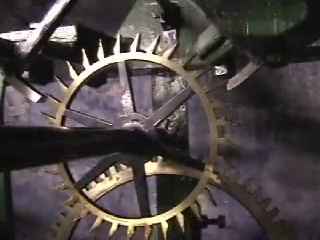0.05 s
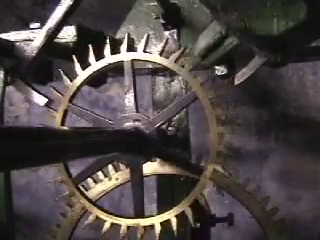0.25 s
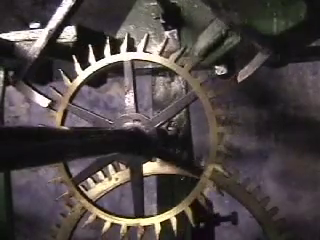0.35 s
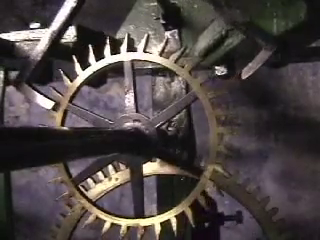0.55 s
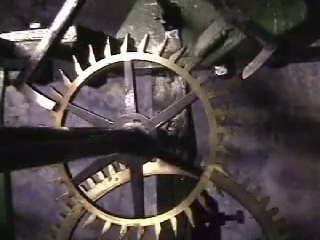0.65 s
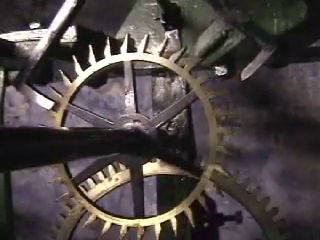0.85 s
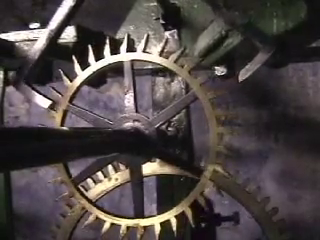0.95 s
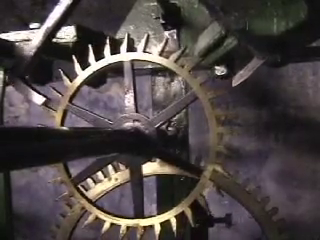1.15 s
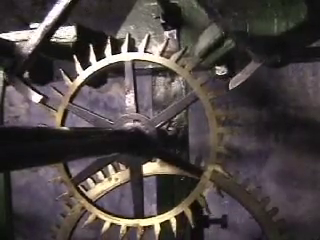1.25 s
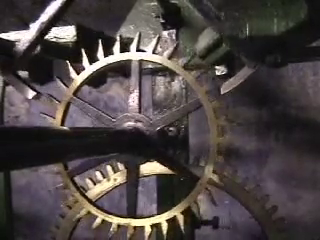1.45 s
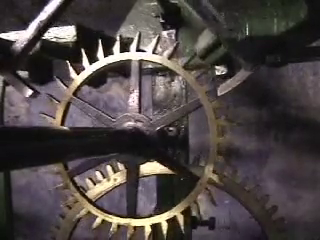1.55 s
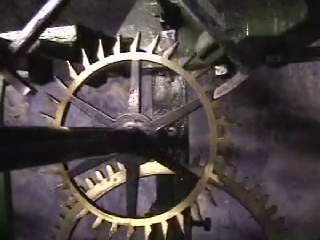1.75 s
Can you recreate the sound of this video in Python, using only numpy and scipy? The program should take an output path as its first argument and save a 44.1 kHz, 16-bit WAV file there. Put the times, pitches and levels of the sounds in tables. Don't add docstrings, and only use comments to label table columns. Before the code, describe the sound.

A big clock escapement ticks twice, very close: first a bright, rattling metal clack with quick rebounds, then over a second later one hard, duller clunk; short stony room echo, low hum, faint camera whine and hiss.

```python
import sys
import numpy as np
from scipy import signal
from scipy.fft import rfft, irfft
from scipy.io import wavfile
from scipy.ndimage import uniform_filter1d

SR = 44100
rng = np.random.default_rng(int(sys.argv[2]) if len(sys.argv) > 2 else 0)


def voltage_ratio(decibels):
    exponent = np.asarray(decibels, float) / 20
    return 10 ** exponent


def generate_wav(signal):
    frames = np.transpose(np.atleast_2d(signal))
    scaled = np.clip(frames, -1, 1) * 32767
    pcm = np.round(scaled).astype(np.int16)
    wavfile.write(sys.argv[1], SR, pcm)


N = 79380

# start in seconds, level in dB, brightest Hz,
# sharpness of that colour from 0 to 1.
ENTRY_CONTACTS = [
    (.2420, -18.5, 8900, 0),
    (.2460, -24, 4630, 0.4),
    (.2510, -23, 5240, .3),
    (.2770, -26, 4500, 0.33),
    (0.2844, -26.5, 3000, 0.24),
    (0.2573, -26.5, 4000, 0.6),
    (0.2724, -22.5, 1500, .6),
    (.3130, -38.5, 1200, 0.3),
]
EXIT_CONTACTS = [
    (1.4267, -30.5, 9000, 0.7),
    (1.4304, -14, 3020, 0.1),
    (1.4400, -53, 1824, 0.9),
]
# frequency in Hz, rise in seconds.
FRAME_RISE = [(60, 0.053), (150, 0.04), (700, 0.00057), (3000, 0.00088), (15000, 0.00022)]
# frequency in Hz, level in dB.
PORT_DB = [(5900, -1.6), (6600, -10), (7300, -10), (8200, -1), (10000, -4.5), (11000, -12), (15000, -17.5)]


def read(points, hz):
    f, value = np.transpose(points)
    return np.interp(np.log(hz + 1), np.log(f + 1), value)


def evened(x):
    return x / np.sqrt(np.mean(x ** 2) + 1e-20)


def slow(rate_hz, count):
    knots = rng.standard_normal((count, 200))
    place = np.arange(N) * rate_hz / SR
    return np.array([np.interp(place, np.arange(200), k) for k in knots])


def drone():
    # time in seconds, pitch in Hz, level in dB.
    course = [(0, 50.9, -56.5), (.22, 49.84, -50.5), (.28, 50.8, -54), (.46, 52.1, -44), (.7, 52.03, -47),
              (1.402, 54.14, -51), (1.8, 56, -58)]
    waver_db, side_db = -0.5, -8
    s, hz, db = np.transpose(course)
    t = np.arange(N) / SR
    level = voltage_ratio(np.interp(t, s, db) + waver_db * slow(10.2, count=1)[0])
    turns = np.cumsum(np.interp(t, s, hz)) / SR
    note = np.sqrt(2) * level * np.sin(2 * np.pi * turns)
    return note + voltage_ratio(side_db) * note * np.array([[1], [-1]])


def camera():
    # order, level in dB.
    orders = [(1, -3), (2, -10), (3, -12), (4, 0), (5, -14), (6, -14), (7, -15), (8, -11), (9, -12),
              (10, -22), (11, -10), (12, -3), (13, -21), (14, -23), (15, -16), (16, -13), (17, -16),
              (18, -17), (19, -17), (20, -8), (21, -17), (22, -17), (23, -14), (24, -9), (25, -17),
              (26, -9), (27, -18), (28, -13), (29, -17), (30, -14), (31, -20), (32, -10), (33, -13),
              (34, -17), (35, -13), (36, -8), (37, -18), (38, -17), (39, -23), (40, -11), (41, -27),
              (42, -24)]
    # frequency in Hz, level in dB.
    gears = [(3365, -80), (3817, -76), (3910, -75), (4167, -79), (4387, -81)]
    drum_hz, drum_db, waver_db = 149.85, -63.5, 1.8
    most_turn = 0.7
    low_hz, top_hz, bearing_db = 1960, 9960, -93
    drum = [(k * drum_hz, db + drum_db) for k, db in orders[1:]]
    bearing = [(low_hz + u * (top_hz - low_hz), bearing_db + 0.63 * v)
               for u, v in rng.random((24, 2)) ** 0.5]
    lines = np.array(drum + list(gears) + bearing)
    first = len(drum) + len(gears)
    lines[first:, 1] += read(PORT_DB, lines[first:, 0])

    phase = 2 * np.pi * rng.random(len(lines))
    turn = most_turn * (2 * rng.random(len(lines)) - 1)
    angle = 2 * np.pi * np.outer(lines[:, 0], np.arange(N) / SR) + phase[:, None]
    angle = angle % (2 * np.pi)
    size = np.sqrt(2) * voltage_ratio(lines[:, 1:] + waver_db * slow(7.12, count=len(lines)))
    middle = np.cos(turn) @ (size * np.sin(angle))
    side = np.sin(turn) @ (size * np.cos(angle))
    return middle + np.array([[1], [-1]]) * side


def hiss():
    # frequency in Hz, density in dB per Hz.
    colour = [(40, -5.5), (85, -4.5), (130, -4), (300, -17), (1000, -19), (2000, -24.5), (5500, -24),
              (15000, -20)]
    level_db, patch_db, swell_db = -53.5, 0.9, 0.6
    frames, hz = N // 256 + 5, np.fft.rfftfreq(1024, 1 / SR)
    draw = rng.standard_normal((5, 513, frames))
    patches = uniform_filter1d(draw[4], 12, 0)
    patches = evened(uniform_filter1d(patches, 14, 1))
    z = (draw[:2] + 1j * draw[2:4]) * voltage_ratio(read(colour, hz)[:, None] + patch_db * patches)
    noise = signal.istft(z, nperseg=1024, noverlap=768)[1][:, :N]
    return voltage_ratio(level_db + swell_db * slow(5.5, count=1)) * evened(noise)


def ticks():
    # start in seconds, level in dB, centre in Hz, width in octaves, 60 dB decay in seconds.
    touches = [(0.216, -52.5, 2900, 0.87, 0.15), (.31, -37, 90, .2, 0.26), (.425, -38, 100, 0.29, 0.22),
               (1.599, -44.5, 262, 0.11, 0.24), (1.39, -52.5, 268, .2, 0.19),
               (1.357, -54.5, 980, 0.91, 0.26), (1.373, -41.5, 3350, 0.5, 0.035),
               (1.5268, -30, 5020, 0.26, 0.075), (1.529, -38.5, 3370, 0.39, 0.093),
               (1.538, -33, 3950, 1, 0.047), (1.55, -41.5, 4530, 0.077, 0.089)]
    rise_cycles = 1.7
    size = 8192
    out = np.zeros((2, N))
    t, f = np.arange(size) / SR, np.fft.rfftfreq(size, 1 / SR)
    for s, db, hz, width, t60 in touches:
        band = np.exp(-.5 * (np.log2((f + 1) / hz) / width) ** 2)
        noise = evened(irfft(rfft(rng.standard_normal((2, size))) * band))
        burst = noise * voltage_ratio(db - 60 * t / t60) * np.minimum(t * hz / rise_cycles, 1)
        part = out[:, round(s * SR):][:, :size]
        part += burst[:, :part.shape[1]]
    return out


def ring(hz, db, t60):
    twin_off, twin_db = 0.005, -11
    t = (np.arange(SR // 2) / SR)[:, None]
    detune = twin_off * np.sqrt(3000 * hz) * (2 * rng.random(len(hz)) - 1)
    hz = np.append(hz, hz + detune)
    db, t60 = np.append(db, db + twin_db), np.append(t60, t60)
    shape = voltage_ratio(-60 * t / t60) * (1 - np.exp(-t / np.abs(read(FRAME_RISE, hz))))
    phases = rng.random(len(hz)) + np.array([[0], [1 / 4]])
    return np.array([(shape * np.sin(2 * np.pi * (hz * t + p))) @ voltage_ratio(db) for p in phases])


def frame(colour, count):
    # frequency in Hz, 60 dB decay in seconds.
    decay = [(60, 1), (160, 0.82), (420, 0.43), (1100, 0.28), (2900, 0.11), (5800, 0.17), (9000, 0.34),
             (14000, 0.13)]
    # centre in Hz, width in Hz, depth in dB.
    dips = [(5680, 110, -8), (8000, 90, -12), (7250, 220, -9), (10950, 130, -16), (11950, 200, -18),
            (13750, 90, -12)]
    level_db, peaky_db, banded_db = 6, 2.5, 2.5
    crack_db, crack_t60, snap_db, snap_t60 = -2, 0.052, -1, 0.021
    size = SR // 2
    t, hz = np.arange(size) / SR, np.fft.rfftfreq(size, 1 / SR)
    peaks = evened(uniform_filter1d(rng.standard_normal(len(hz)), size=9))
    bands = evened(uniform_filter1d(rng.standard_normal(len(hz)), size=160))
    bands = banded_db * np.minimum(hz / 10000, 1) * bands
    for f, width, db in dips:
        bands = bands + db * np.exp(-.5 * ((hz - f) / width) ** 2)
    z = rfft(rng.standard_normal((2, size))) * voltage_ratio(level_db + read(colour, hz) + peaky_db * peaks + bands)

    place = np.log(np.clip(hz, 50, 16000) / 50) / np.log(16000 / 50) * (count - 1)
    out = 0
    for k, f in enumerate(np.geomspace(50, 16000, count)):
        shape = voltage_ratio(-60 * t / read(decay, f))
        if f > 1200:
            shape = shape + voltage_ratio(crack_db - 60 * t / crack_t60) + voltage_ratio(snap_db - 60 * t / snap_t60)
        shape = shape * (1 - np.exp(-t / abs(read(FRAME_RISE, f))))
        out = out + shape * irfft(z * np.clip(1 - abs(place - k), 0, 1), size)
    return out


def blows(contacts):
    out, t = np.zeros(N), np.arange(64) / SR
    for s, db, hz, sharp in contacts:
        sharp = np.clip(sharp, 0, 1)
        resonance = np.cos(2 * np.pi * hz * t) * np.exp(-t * hz * 5.4) * np.sqrt(hz / 3000)
        click = sharp * 0.57 * resonance
        click[0] += 1 - sharp
        at = round(s * SR)
        out[at:at + 64] += voltage_ratio(db) * click
    return out


def beat(contacts, modes, modes_db, ring_db, colour):
    hz, t60 = np.transpose(modes)
    main_blow = np.zeros(N)
    main_blow[round(contacts[1][0] * SR)] = voltage_ratio(ring_db - 16.5)
    modes_db = np.array(modes_db) - read(PORT_DB, hz)
    wheel = signal.fftconvolve(main_blow[None], ring(hz, modes_db, t60), axes=1)
    iron = signal.fftconvolve(blows(contacts)[None], frame(colour, count=18), axes=1)
    return (wheel + iron)[:, :N]


def entry_drop():
    # frequency in Hz, 60 dB decay in seconds.
    modes = [(92, .8), (197, .13), (268, .45), (388, .4), (429, .45), (697, .3), (759, .3), (931, .21),
             (1840, .11), (4081, .12), (5306, .18), (9470, .15), (11540, .17), (12540, .12)]
    modes_db = [-8, 5, -3.5, -11, -12, -6.5, -7.5, -10.5, -4.5, -2.5, 3.5, 5.5, -7.5, -8]
    # frequency in Hz, density in dB per Hz.
    colour = [(45, -31), (75, 0.5), (200, 1.5), (1000, -5.5), (2200, -7), (5200, -6), (9500, -7),
              (15000, -5)]
    return beat(ENTRY_CONTACTS, modes, modes_db, ring_db=-7.5, colour=colour)


def anchor():
    # frequency in Hz, 60 dB decay in seconds.
    modes = [(4497, .175), (5308, .15), (5438, .42), (5925, .4), (6318, .35), (8430, .18), (8538, .25),
             (8815, .24), (9300, .2), (9440, .15), (9943, .15), (10535, .13)]
    # level of every mode in dB, for one pallet.
    modes_db = [
        [-23, -27, -31, -35, -42, -26, -37, -31, -38, -29, -25, -25],
        [-31, -45, -30, -37, -32, -40, -25, -27, -26, -26, -33, -35],
    ]
    muted_s = [.46, 1.527]
    muting_db_per_s = [100, 300]
    hz, t60 = np.transpose(modes)
    starts = ENTRY_CONTACTS[3][0], EXIT_CONTACTS[1][0]
    out, t = 0, np.arange(N) / SR
    for s, db, mute_s, mute_db in zip(starts, modes_db, muted_s, muting_db_per_s):
        sound = np.pad(ring(hz, np.array(db), t60), ((0, 0), (round(s * SR), N)))[:, :N]
        out = out + sound * voltage_ratio(-mute_db * np.maximum(t - mute_s, 0))
    return out


def room(pair):
    # frequency in Hz, 60 dB decay in seconds.
    decay = [(100, 0.14), (500, 0.51), (2000, 0.44), (8000, 0.21)]
    size = SR // 2
    taps = rng.choice([-1., 1.], (2, size)) * (rng.random((2, size)) < .06)
    taps[:, :200] = 0
    hz, t, z = signal.stft(taps, SR, nperseg=256)
    tail = signal.istft(z * voltage_ratio(-60 * t / read(decay, hz)[:, None]), SR, nperseg=256)[1]
    return signal.fftconvolve(pair, tail / np.linalg.norm(tail[0]), axes=1)[:, :N]


def squeaks():
    # start in seconds, level in dB, pitch in Hz, 60 dB decay in seconds.
    chirps = [
        (.955, -60, 2350, .08),
        (.995, -59, 2350, .08),
    ]
    out, t = np.zeros(N), np.arange(N) / SR
    for s, db, hz, t60 in chirps:
        u = np.maximum(t - s, 0)
        out += voltage_ratio(db - 60 * u / t60) * np.minimum(u / 0.001, 1) * np.sin(2 * np.pi * hz * u)
    return out


def exit_drop():
    # frequency in Hz, 60 dB decay in seconds.
    modes = [(267, .7), (428, .28), (701, .22), (754, .33), (1118, .42), (1492, .21), (1735, .25),
             (2665, .11), (2772, .12), (3082, .1), (3252, .1), (5283, .2), (5716, .09), (11580, .2)]
    modes_db = [-5.5, 0.5, -2, -4, -32, 0.5, -6, -3, 0, 7, -0.5, -1.5, -2, -12]
    # frequency in Hz, density in dB per Hz.
    colour = [(45, -26), (70, -4), (400, -3), (1150, -8), (3000, -6), (5300, -7.5), (9000, -7), (15000, -6)]
    return beat(EXIT_CONTACTS, modes, modes_db, ring_db=-10.5, colour=colour)


def ports(pair, same):
    # frequency in Hz, left over right in dB.
    left_db = [(60, 6.0), (180, 5.0), (550, 3.5), (1650, 2.0), (4970, 1.0), (15000, 1.5)]
    hz = np.fft.rfftfreq(N, 1 / SR)
    a, b = rfft(pair, axis=1) * voltage_ratio(read(PORT_DB, hz))
    c = np.clip(read(same, hz), -1, 1)
    lean = voltage_ratio(read(left_db, hz) / 2)
    left = a * lean
    right = (c * a + np.sqrt(1 - c ** 2) * b) / lean
    return irfft(np.array([left, right]), N, axis=1)


def scene():
    # frequency in Hz, correlation from -1 to 1.
    blow_same = [(100, .98), (2000, .94), (6700, .95), (7400, -.7), (8300, -.6), (9200, .45), (11500, .3),
                 (13500, .85)]
    # frequency in Hz, correlation from -1 to 1.
    hiss_same = [(60, .97), (300, .55), (1400, .6), (5800, .6), (6600, -.75), (7600, -.85), (8300, -.55),
                 (9500, -.3), (11000, 0.01)]
    room_db = -10.5
    clock = ticks() + entry_drop() + anchor() + squeaks() + exit_drop()
    near = ports(clock + voltage_ratio(room_db) * room(clock), blow_same)
    return near + ports(hiss(), hiss_same) + drone() + camera()


def top_cut(x):
    return signal.sosfilt(signal.butter(12, 16420, fs=SR, output="sos"), x)


def record(dry):
    # frequency in Hz, level in dB.
    top_edge = [(15150, 0), (15450, -24), (16300, -30), (16450, -70)]
    limit = 0.75
    soft = limit * np.tanh(dry / limit)
    edge = voltage_ratio(read(top_edge, np.fft.rfftfreq(N, 1 / SR)))
    mix = irfft(rfft(soft, axis=1) * edge, N, axis=1)
    return top_cut(mix)


dry = scene()
out = record(dry)
generate_wav(out)
```